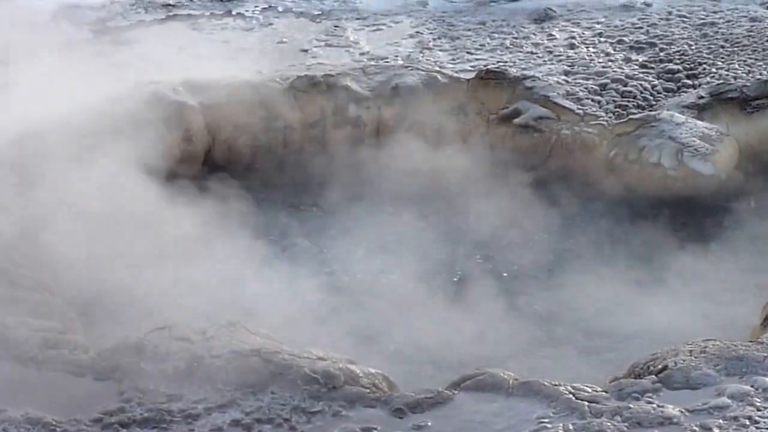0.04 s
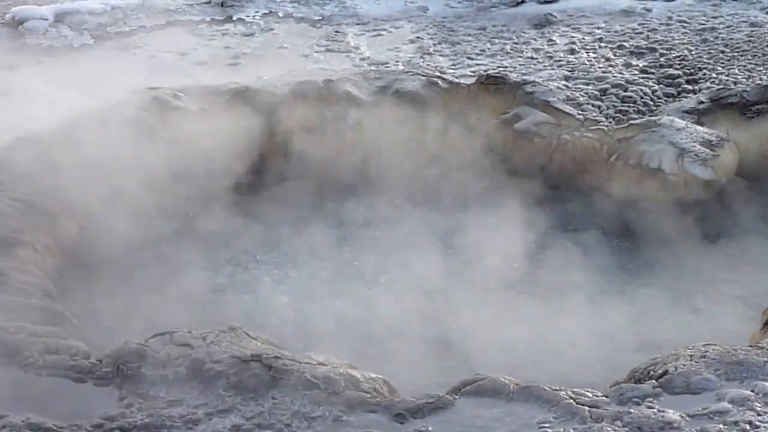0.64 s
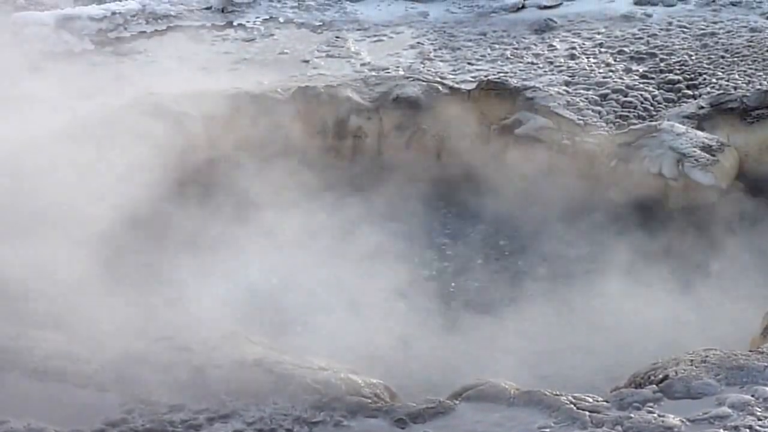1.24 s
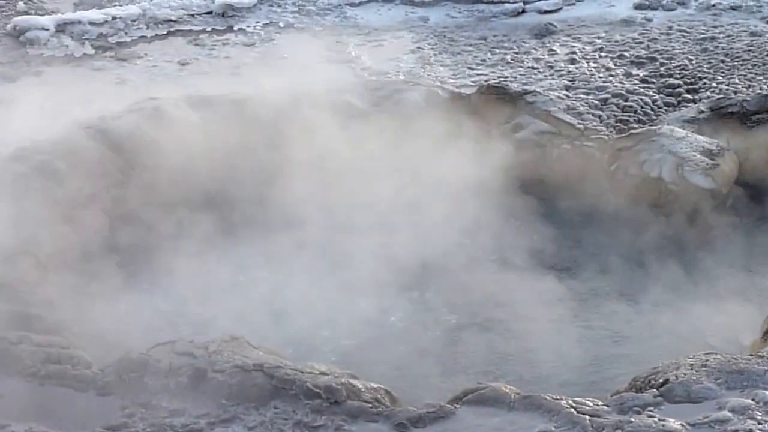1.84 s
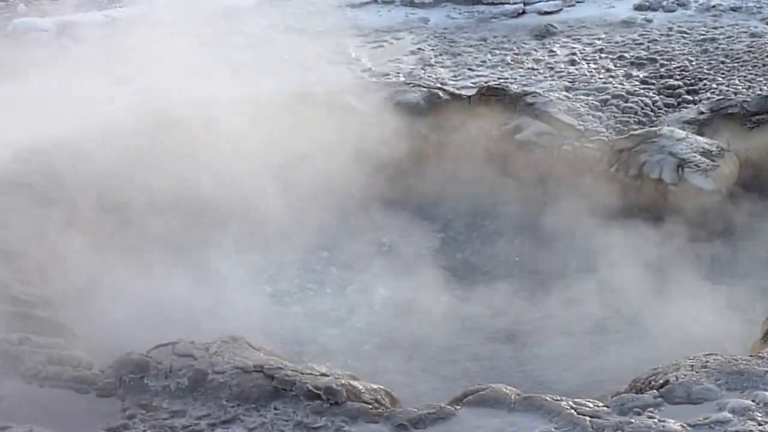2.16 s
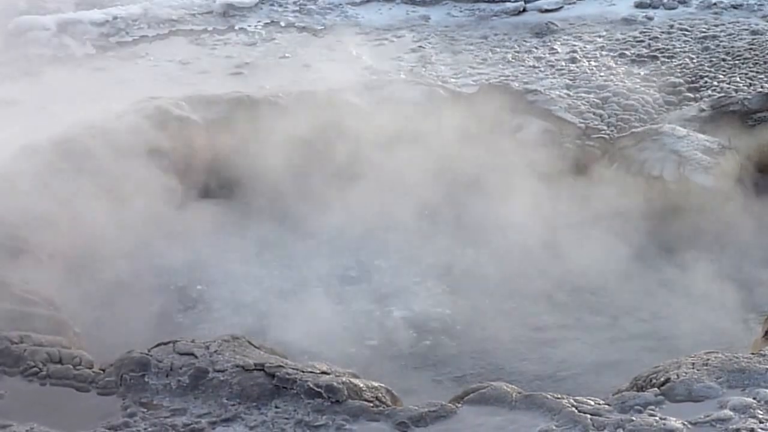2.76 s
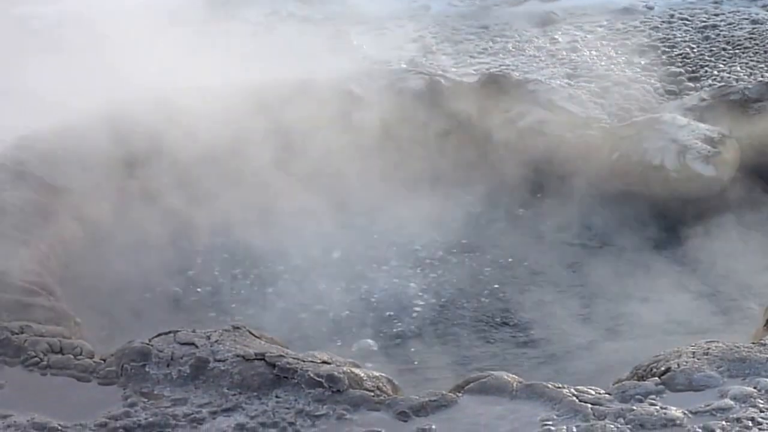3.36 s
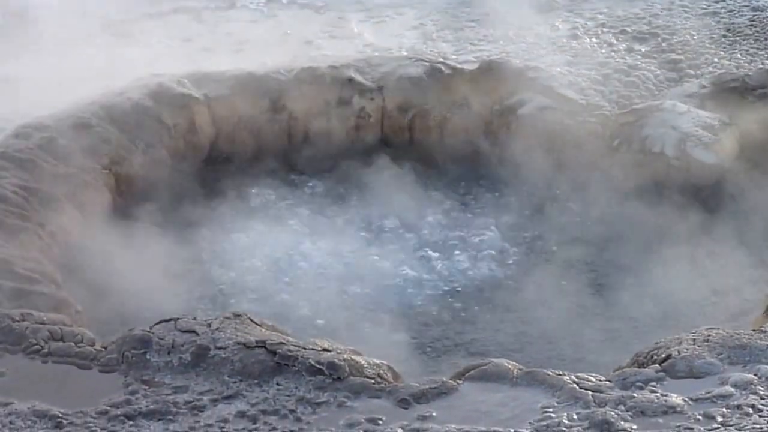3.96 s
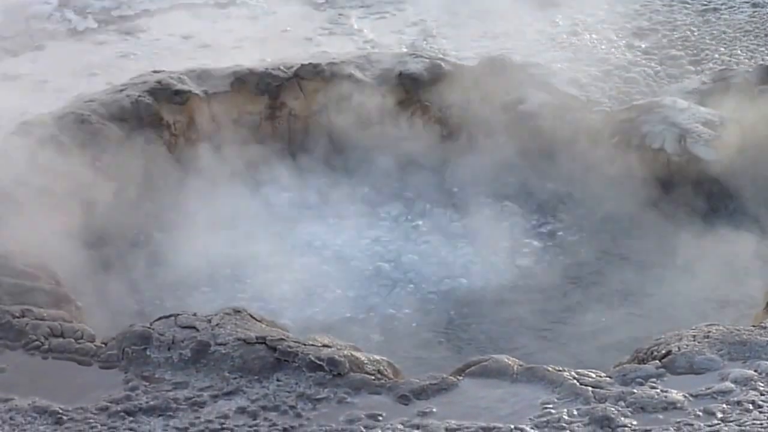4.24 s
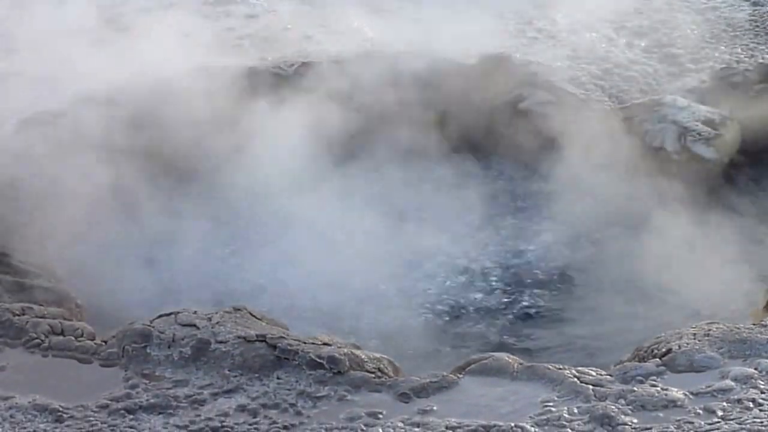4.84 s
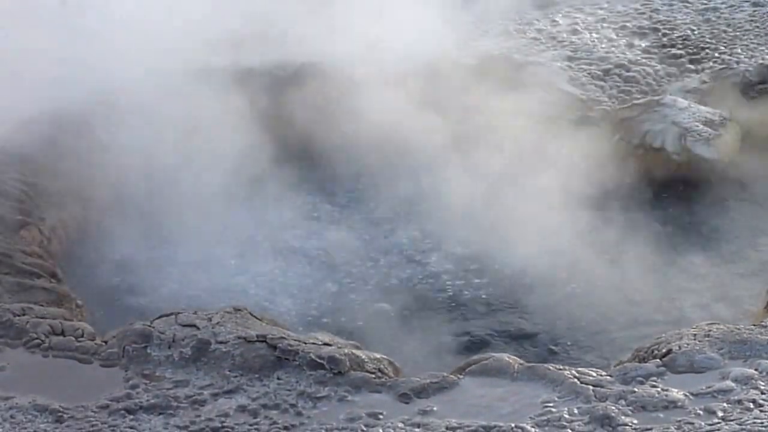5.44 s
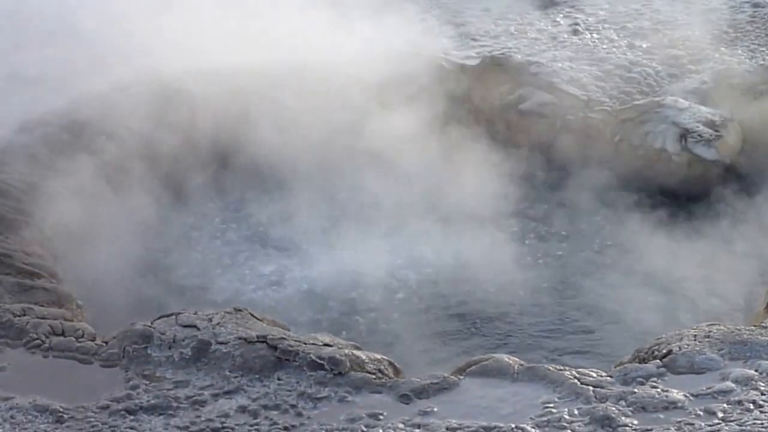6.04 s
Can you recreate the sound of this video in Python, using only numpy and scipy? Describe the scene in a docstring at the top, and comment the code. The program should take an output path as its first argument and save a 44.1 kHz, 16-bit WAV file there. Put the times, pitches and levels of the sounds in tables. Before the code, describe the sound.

A hot spring gurgles, plops and fizzes steadily while gusts of wind rumble and buffet the microphone.

```python
"""A rock basin in cold, open country, where a hot spring boils.
Steam pockets gurgle, splash and plop as they resonate in the water; small bubbles fizz at the surface
and spray ticks down nearby. The bare rock adds one close reflection. Gusts of wind shed eddies over
the two microphone ports, and their turbulent pressure rumbles in front of it all."""
import sys
import numpy as np
from scipy import signal
from scipy.io import wavfile
from scipy.ndimage import uniform_filter1d

SR = 44100
rng = np.random.default_rng(int(sys.argv[2]) if len(sys.argv) > 2 else 0)


def store_wav(level_fs):
    """Save 16-bit WAV to argv[1]."""
    pcm = np.round(np.clip(np.atleast_2d(level_fs), -1, 1) * 32767)
    wavfile.write(sys.argv[1], SR, pcm.T.astype(np.int16))


N = 273420

# Strength of the upwelling. Each row: time in seconds, level in dB.
CHURN_LEVEL = [(0.0, -62.5), (0.36, -62), (0.69, -64), (1.31, -63), (3.66, -63), (4.3, -59), (5.97, -59),
               (6.2, -60.5)]
# Spectra of the large and the middling bubbles. Each row: frequency in Hz, relative density in dB.
GURGLE_SPECTRUM = [(25, -7), (60, -20.5), (150, -4), (240, 0), (340, -0.5), (520, -7), (750, -11),
                   (1100, -24)]
SPLASH_SPECTRUM = [(500, -15.5), (750, 4), (980, -2), (1250, 5.5), (1650, -9.5), (1950, -2), (2550, -5),
                   (3600, -6), (6000, -16)]
GURGLE_FOLLOWS = 1.04   # dB of gurgle per dB of churning

def churning():
    """Bubble resonance falls with size: large steam pockets gurgle, smaller ones splash higher up."""
    churn_db = in_time(CHURN_LEVEL)
    gurgle_db = GURGLE_FOLLOWS * (churn_db - churn_db.mean()) - 56
    gurgle = bubble_cloud(GURGLE_SPECTRUM, per_s=300, size_db=1.5, wash_db=1.5,
                          surge_db=1.14, patchy_db=-0.67, bands=11)
    splash = bubble_cloud(SPLASH_SPECTRUM, per_s=2000, size_db=3, wash_db=2,
                          surge_db=0.87, patchy_db=1, bands=13)
    return from_db(gurgle_db) * gurgle + from_db(churn_db + 1) * splash


# The largest bubbles bursting. Each row: start in seconds, level in dB, pitch in Hz.
BURSTS = [(0.19, -42, 380), (0.378, -42, 418), (0.397, -40.5, 424), (0.437, -47, 404), (0.91, -47, 394),
          (0.969, -46.5, 855), (1.316, -39, 398), (1.333, -42, 702), (1.89, -40, 343), (2.338, -45.5, 410),
          (2.785, -37.5, 365), (2.842, -46, 418), (2.863, -43, 470), (3.107, -50, 1080), (3.143, -54, 910),
          (3.316, -45, 605), (3.347, -44, 438), (3.429, -45.5, 1030), (3.712, -48, 1020), (4.036, -44, 666),
          (4.132, -42, 380), (4.722, -48, 480), (4.918, -47, 2760), (5.078, -38, 360), (5.095, -39, 409),
          (5.322, -43.5, 2380), (5.325, -41.5, 387), (5.626, -42.5, 360), (5.639, -43.5, 344),
          (5.665, -41.5, 1200), (5.677, -38.5, 324), (5.709, -41.5, 350)]
SPLATTER_DB, SPLATTER_HZ, SPLATTER_DB_PER_OCTAVE = -9, 400, 3   # higher bubbles splatter more

def plops(cycles, rise):
    """A burst cavity is a damped resonator whose pitch rises as it opens, while its torn film splatters."""
    out, t = np.zeros((2, N)), np.arange(SR // 10) / SR
    for s, level_db, hz in BURSTS:
        age = t * hz / cycles   # 1 after 60 dB of decay
        ring = np.sin(2 * np.pi * hz * t * (1 + rise * (np.minimum(age, 1) - .2)))
        noise = rng.standard_normal((2, len(t))) + 2 * rng.standard_normal(len(t))
        splatter = rms_one(band(noise, hz * 0.38, hz * 1.4))
        splatter *= from_db(SPLATTER_DB + SPLATTER_DB_PER_OCTAVE * np.log2(hz / SPLATTER_HZ))
        envelope = (1 - np.exp(-t * hz * 2)) * from_db(-60 * age)
        add(out, s, from_db(level_db) * envelope / envelope.max() * (ring + splatter))
    return out * panned(side_db=1)


# Strength of the surface fizz. Each row: time in seconds, level in dB.
FIZZ_LEVEL = [(0.04, -67), (0.05, -68), (0.53, -66.5), (0.85, -68), (3.14, -63), (3.93, -66.5), (4.88, -63),
              (5.59, -62), (6.12, -65)]
# Spectrum of the smallest bubbles. Each row: frequency in Hz, relative density in dB.
FIZZ_SPECTRUM = [(1500, 0.5), (3000, 2), (4000, 0), (7000, 1.5), (10000, -1.5), (13500, -2), (16000, -18)]

def fizz():
    """The smallest bubbles resonate highest, and their dense bursts merge into a hiss."""
    cloud = bubble_cloud(FIZZ_SPECTRUM, per_s=3000, size_db=4, wash_db=8.5,
                         surge_db=0.55, patchy_db=0.63, bands=9)
    return from_db(in_time(FIZZ_LEVEL) + 1.5) * cloud


# Likeness of the pool's two channels. Each row: frequency in Hz, coherence from 0 to 1.
POOL_COHERENCE = [(30, 0.24), (130, 1), (290, 0.98), (640, 0.93), (1400, 0.48), (3000, 0.37), (7000, 0.17),
                  (15000, 0.39)]
# Balance of the pool. Each row: frequency in Hz, left over right in dB.
POOL_BALANCE = [(100, 0), (1000, 1.5), (3000, -0.8), (6000, 0), (14000, 0.5)]

def bubble_cloud(spectrum, per_s, size_db, wash_db, surge_db, patchy_db, bands):
    """Superposition: random bursts ring briefly in their own bands over a wash of countless smaller ones."""
    out, surge = 0, drift(5.7)
    for low, hz, high in bands_of(spectrum, bands):
        when, rarity, *signs = rng.random((N // 20, 4))[:int(per_s / bands * N / SR)].T
        sizes = from_db(size_db * np.minimum(-np.log(rarity), 4))
        clicks = np.zeros((2, N))
        clicks[:, (when * N).astype(int)] = sizes * (np.array(signs) - .5)
        wash = from_db(wash_db) * rng.standard_normal((2, N))
        mid, side = rms_one(band(rms_one(clicks) + wash, low, high))
        coherence = np.clip(at_hz(POOL_COHERENCE, hz), 0, .99)
        stereo = np.sqrt(1 + coherence) * mid + np.sqrt(1 - coherence) * side * [[1], [-1]]
        density_db = at_hz(spectrum, hz) + surge_db * surge + patchy_db * drift(11.5)
        out = out + np.sqrt(high - low) * from_db(density_db) * panned(at_hz(POOL_BALANCE, hz)) * stereo
    return rms_one(out)


# The largest drops landing close by. Each row: start in seconds, peak level in dB.
LARGE_DROPS = [(0.549, -49), (1.048, -48), (2.717, -43.5), (2.763, -46), (3.102, -46), (3.163, -44),
               (3.270, -46), (4.544, -45), (5.434, -45.5), (5.837, -47)]
DROPS_PER_S, DROP_DB, DROP_SPREAD_DB = 5.4, -55.5, 7   # lesser drops, at random

def spray(t60_s):
    """A brief impact has a broad spectrum: each drop lands with a tiny bright snap."""
    out, t = np.zeros((2, N)), np.arange(SR // 100) / SR
    when, size = rng.random((200, 2))[:int(DROPS_PER_S * N / SR)].T
    lesser = zip(when * N / SR, DROP_DB + DROP_SPREAD_DB * (2 * size - 1))
    for s, peak_db in [*LARGE_DROPS, *lesser]:
        noise = rng.standard_normal(len(t)) + 0.58 * rng.standard_normal((2, len(t)))
        snap = band(noise * from_db(-60 * t / t60_s), 4500, 15000, order=1)
        add(out, s, from_db(peak_db) * snap / np.abs(snap.mean(axis=0)).max())
    return out * panned(side_db=3)


# The water wells up a little to the left. Each row: time in seconds, right channel's lag in seconds.
RIGHT_LAG = [(0, 0.00018), (2.2, 0.000086), (6.2, 0.000016)]

def from_the_left(x):
    """Path difference: sound from the left reaches the right channel later."""
    return np.array([x[0], delayed(x[1], in_time(RIGHT_LAG))])


def rock_echo(x, delay_s, gain):
    """Comb filtering: one close reflection off the bare crust ripples the spectrum of the hiss."""
    return x + gain * np.array([delayed(channel, delay_s) for channel in x])


# Gusts at the ports. Each row: start in seconds, hold in seconds, level in dB, left over right in dB.
PORT_GUSTS = [(0.261, .11, -47.5, 15), (0.358, 0.073, -42.5, -14), (0.722, 0.13, -40, 0),
              (0.956, 0.064, -40, 0.5), (1.044, 0.043, -40.5, 16), (1.183, 0.13, -42.5, 14),
              (1.369, 0.054, -34, 1), (1.452, 0.22, -39, 10), (1.67, 0.21, -33, 3.5),
              (1.938, 0.32, -33, 1.5), (2.384, 0.15, -36.5, 5), (2.611, .15, -36, 9),
              (2.83, 0.085, -44.5, 11), (2.951, .16, -38.5, 10), (3.136, 0.021, -41, 13),
              (3.226, 0.026, -42.5, 7), (3.401, 0.22, -36.5, 5), (3.765, 0.014, -39, 32),
              (3.94, 0.15, -30.5, 3), (4.102, 0.077, -37, 8), (4.208, 0.14, -39.5, 7),
              (4.253, 0.016, -29, -1), (4.394, 0.048, -30.5, 1), (4.472, 0.088, -44, 8),
              (4.971, 0.047, -34.5, -0.5), (5.241, 0.048, -31.5, 8), (5.892, 0.022, -31.5, 5.5),
              (5.96, .1, -42, 21), (6.066, 0.12, -30, -0.5)]
GUST_ATTACK_S, GUST_RELEASE_S = 0.015, 0.022   # time constants before and after the hold
FLUTTER_DB, FLUTTER_HZ = 1.5, 19.6   # buffeting within a gust
BREEZE_DB, WAKE_DB, WAKE_S = -61.5, -14, 0.14   # air between gusts; stirred air around each

def gust_pressure():
    """Incoherent powers add: gusts, their wakes and the breeze set the pressure envelope at each port."""
    t, power = np.arange(N) / SR, 0
    for s, hold_s, level_db, side_db in PORT_GUSTS:
        fade = np.maximum(s - t, 0) / GUST_ATTACK_S + np.maximum(t - s - hold_s, 0) / GUST_RELEASE_S
        power = power + (from_db(level_db) * panned(side_db)) ** 2 * np.exp(-2 * np.minimum(fade, 20))
    wake = from_db(WAKE_DB) ** 2 * uniform_filter1d(power, size=int(WAKE_S * SR), axis=1)
    return np.sqrt(power + wake + from_db(BREEZE_DB) ** 2) * from_db(FLUTTER_DB * drift(FLUTTER_HZ))


# Spectrum of the turbulence. Each row: frequency in Hz, relative density in dB.
WIND_SPECTRUM = [(20, -35), (35, -9), (52, 6), (95, 7.5), (150, -2), (240, -12), (320, -17), (480, -35),
                 (800, -40)]

def wind(shared, lumpy_db, brighten, deepen, gain_db):
    """Turbulence: a fast gust sheds small, higher eddies; a lasting one builds large, deep ones."""
    pressure, rumble = gust_pressure(), 0
    gust_db = 10 * np.log10(np.mean(pressure ** 2, axis=0))
    force_db = np.minimum(gust_db - np.percentile(gust_db, 80), 1)
    lasting_db = uniform_filter1d(gust_db, size=SR // 2) - gust_db
    for low, hz, high in bands_of(WIND_SPECTRUM, count=11):
        swirl = rms_one(band(rng.standard_normal((2, N)) + shared * rng.standard_normal(N), low, high))
        octaves = np.log2(hz / 110)
        tilt_db = brighten * force_db * max(octaves, 0) + deepen * lasting_db * np.clip(-octaves, 0, 1)
        rumble = rumble + swirl * np.sqrt(high - low) * from_db(at_hz(WIND_SPECTRUM, hz) + tilt_db)
    power = uniform_filter1d(uniform_filter1d(rumble ** 2, size=1300, axis=1), size=700, axis=1)
    steady = rumble / np.sqrt(power + 1e-20)   # levelled, so that the gusts set the strength
    lumps = from_db(lumpy_db * np.array([drift(47), drift(28)]))
    return steady * lumps * pressure * from_db(gain_db)


# The strongest eddies. Each row: centre in seconds, level in dB, pitch in Hz, left over right in dB.
VORTICES = [(1.069, -26.5, 137, 7), (1.733, -20, 223, 8), (1.739, -21, 417, 6), (1.779, -21, 125, 17),
            (2.147, -23, 153, -5), (2.501, -22, 102, 33), (3.047, -25, 135, 8), (3.418, -22, 160, 18),
            (3.477, -21.5, 115, 24), (3.55, -22, 153, 27), (4.428, -20.5, 148, -1), (4.978, -24, 159, 18),
            (5.283, -17.5, 177, 18), (5.295, -20.5, 230, 11)]

def eddies(width_cycles):
    """A passing vortex swings the pressure to and fro, a quarter cycle apart at the two ports."""
    out, t = np.zeros((2, N)), np.arange(-SR // 40, SR // 40) / SR
    for s, level_db, hz, side_db in VORTICES:
        phase = rng.uniform(0, 2 * np.pi) + np.array([[np.pi / 2], [0]])
        swing = np.cos(2 * np.pi * hz * t + phase) * np.exp(-(t * hz / width_cycles) ** 2)
        add(out, s + t[0], from_db(level_db) * swing * panned(side_db))
    return out


def from_db(db):
    return 10 ** (np.asarray(db) / 20)


def rms_one(x):
    return x / np.sqrt(np.mean(x ** 2) + 1e-20)


def in_time(curve):
    """Linear interpolation of a curve at every sample."""
    return np.interp(np.arange(N) / SR, *np.transpose(curve))


def at_hz(spectrum, hz):
    """Interpolation on a log-frequency axis."""
    frequencies, values = np.transpose(spectrum)
    return np.interp(np.log(hz), np.log(frequencies), values)


def panned(side_db):
    """Left and right gains of constant total power."""
    gains = from_db(np.array([[.5], [-.5]]) * side_db)
    return gains / np.sqrt(np.mean(gains ** 2, axis=0))


def drift(hz):
    """Low-passed noise: a slow random fluctuation of unit RMS."""
    pole = np.exp(-80 * np.pi * hz / SR)   # one step per 40 samples
    slow = signal.lfilter([1], [1, -2 * pole, pole * pole], rng.standard_normal(N // 40 + 2002))[2000:]
    return np.interp(np.arange(N) / 40, np.arange(len(slow)), rms_one(slow))


def band(x, low_hz, high_hz, order=2):
    """Butterworth band-pass."""
    sos = signal.butter(order, [low_hz, min(high_hz, .45 * SR)], "band", fs=SR, output="sos")
    return signal.sosfilt(sos, x + 1e-18)


def bands_of(spectrum, count):
    """Low edge, centre and high edge of constant-Q bands across a spectrum."""
    edges = np.geomspace(spectrum[0][0], spectrum[-1][0], count + 1)
    return zip(edges, np.sqrt(edges[:-1] * edges[1:]), edges[1:])


def add(out, s, sound):
    """Superpose a short sound at s seconds."""
    start = int(np.clip(round(s * SR), 0, N - 1))
    out[..., start:start + sound.shape[-1]] += sound[..., :N - start]


def delayed(x, delay_s):
    """Fractional delay by interpolation."""
    n = np.arange(N)
    return np.interp(n - delay_s * SR, n, x, left=0)


def scene():
    """Pressures add: the pool a few steps away, the wind right on the microphone."""
    boil, hiss = churning(), fizz()
    pool = from_the_left(boil + plops(cycles=20.7, rise=0.19)) + hiss + spray(t60_s=.006)
    gusts = wind(shared=0.25, lumpy_db=3, brighten=0.98, deepen=0.33, gain_db=-0.5)
    return rock_echo(pool, delay_s=.00119, gain=.13) + gusts + eddies(width_cycles=0.58)


NOTCH_HZ, NOTCH_WIDTH_HZ, CUTOFF_HZ = 7940, 390, 15650

def record(dry):
    """Frequency response of the microphone: a narrow treble notch, then a steep low-pass."""
    notched = signal.lfilter(*signal.iirnotch(NOTCH_HZ, NOTCH_HZ / NOTCH_WIDTH_HZ, fs=SR), dry)
    return signal.sosfilt(signal.ellip(10, .2, 80, CUTOFF_HZ, fs=SR, output="sos"), notched)


dry = scene()
out = record(dry)
store_wav(out)
```